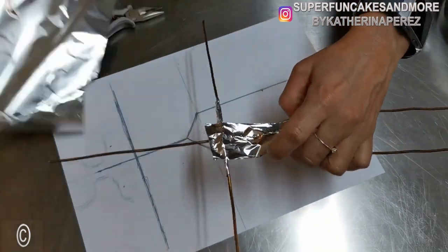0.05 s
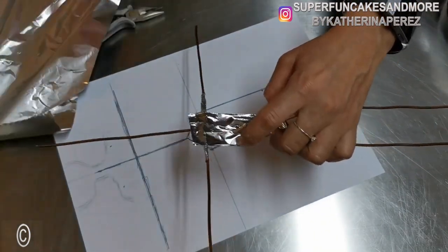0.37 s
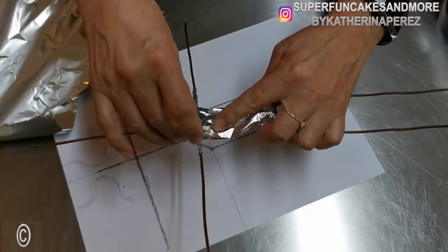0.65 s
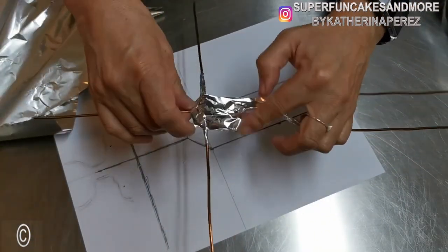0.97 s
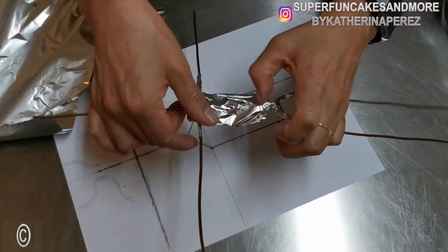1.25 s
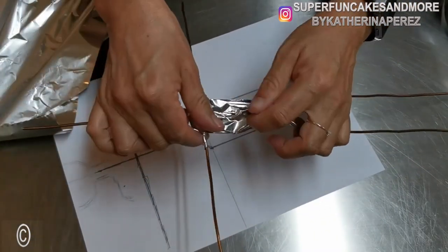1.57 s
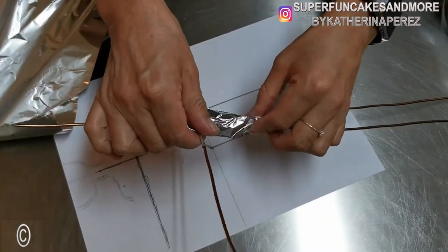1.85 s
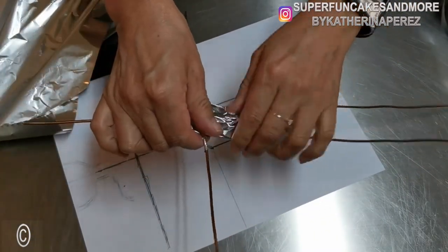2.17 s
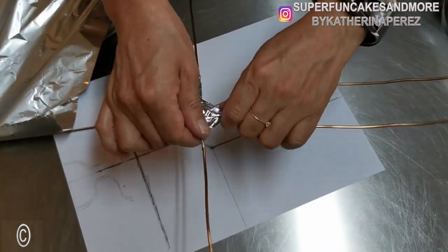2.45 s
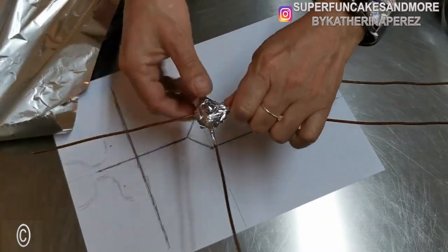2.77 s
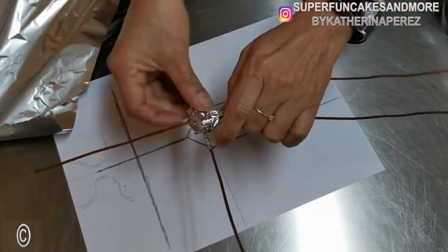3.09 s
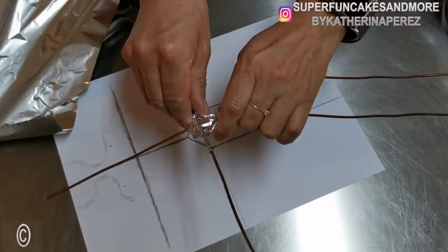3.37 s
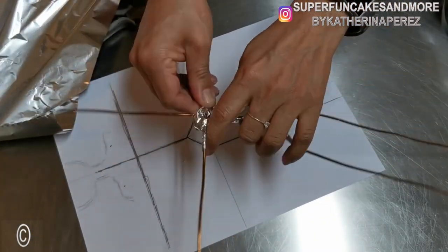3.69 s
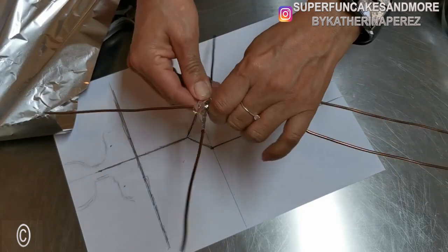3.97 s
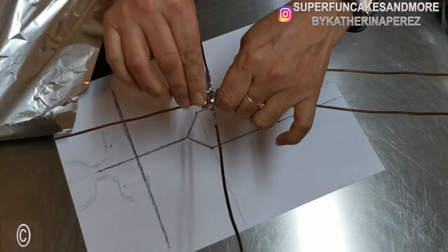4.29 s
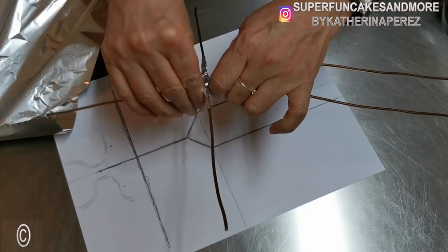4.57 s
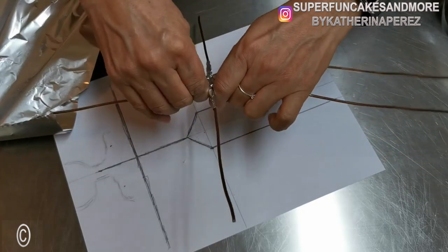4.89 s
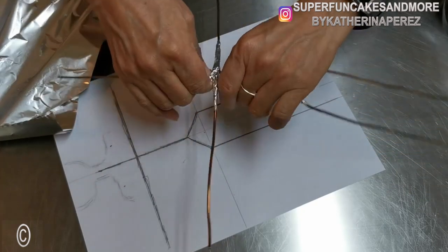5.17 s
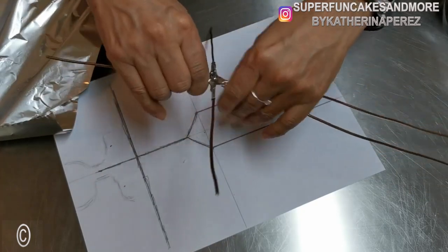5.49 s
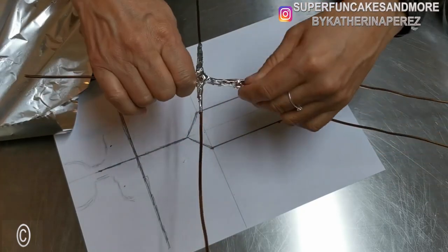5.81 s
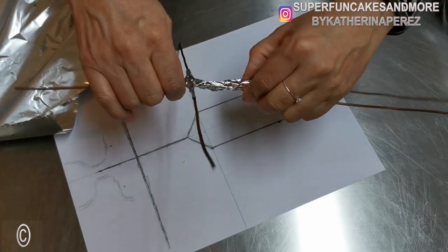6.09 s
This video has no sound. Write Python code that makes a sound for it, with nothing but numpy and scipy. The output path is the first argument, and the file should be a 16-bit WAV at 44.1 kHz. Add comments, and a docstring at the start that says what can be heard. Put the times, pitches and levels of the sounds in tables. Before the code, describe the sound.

A loose sheet of aluminium foil rustles as it is tugged aside. Hands then squeeze a strip of foil around a wire frame, making crisp crinkles and sharp snaps, with a few dull knocks on a steel table. The crackles thin out as the wad tightens, and the wire jolts the loose sheet into several short rattles. The microphone is close, in a small, hard room with a faint low hum.

```python
"""Aluminium foil: hands pull a loose sheet aside, then squeeze a strip round a wire frame on a steel table.
The sheet rustles as tiny facets flip; in the wad, fine creases crush and large ones snap one by one.
Wire and knuckles knock on the table; the wire's free end jolts the sheet, which rattles and rings.
A small hard room answers each snap, over air, hum and a low throb.
The right microphone hears little of the top octave."""
import sys
import numpy as np
from scipy import signal
from scipy.fft import rfft, irfft, next_fast_len
from scipy.io import wavfile

SR = 44100
rng = np.random.default_rng(int(sys.argv[2]) if len(sys.argv) > 2 else 0)


def transcribe(u):
    """Save the signal u as a 16-bit wav file named by the first command-line argument.

    u: samples, shape (n,) or (channels, n), limited to [-1, 1]; the rate is SR.
    q: integer samples, one column per channel.
    """
    v = np.clip(np.atleast_2d(u).T, -1, 1)
    q = np.round(v * 32767).astype(np.int16)
    wavfile.write(sys.argv[1], SR, q)


N = 275184
TIME_S = np.arange(N) / SR

# Tugs on the sheet. Each row: start in seconds, level in dB, hold in seconds.
SHEET_TUGS = [(0, -30, 0.0084), (.016, -32.5, 0.022), (0.089, -28, .006), (0.147, -28.5, 0.0033),
              (0.189, -30, .028), (0.2473, -23, 0.013), (0.286, -26.5, 0.041), (0.332, -22.5, 0.023),
              (0.401, -27, 0.033), (0.462, -31, 0.0069)]
# Spectra of sheet rustle, sheet on table, crushed wad. Each row: frequency in Hz, relative level in dB.
RUSTLE_DB = [(100, -67), (250, -22), (500, -23), (900, -13), (1600, -10.5), (2200, -2.5), (3500, -0.5),
             (6800, 3), (8000, 1), (9200, 6), (10800, 9), (12500, 4.5), (14000, 5), (16000, -11.5)]
DRAG_DB = [(150, -39.5), (370, 5), (520, -2.5), (720, 3.5), (1100, -17.5), (2500, -56)]
WAD_DB = [(100, -32), (400, -6), (1000, -11.5), (2200, -10.5), (3500, 1), (6500, -1.5), (8000, -3),
          (11000, 4.5), (13500, -4), (16000, 0)]
# Modes of sheet and table. Each row: frequency in Hz, relative level in dB, t60 in seconds.
SHEET_RESONANCES = [(219.6, -13, 0.61), (323, -5, 0.035), (484, -12.5, 0.2), (695, -16.5, 0.36),
                    (881, -9, 0.1), (1036, -34.5, 0.17), (1324, -7, 0.036), (1590, -23.5, 0.068),
                    (1974, -12.5, 0.048), (2076, 6.5, 0.029), (2130, -18, 0.12), (2280, -2, 0.038),
                    (4730, 6.5, 0.019)]
TABLE_RESONANCES = [(222.6, -22, 0.094), (620, -9, 0.015), (800, -2.5, 0.017), (934, -16.5, 0.12),
                    (972, -8.5, 0.056), (1200, -25, 0.017), (1250, -10.5, 0.025), (1860, -8.5, 0.02),
                    (3540, -4, 0.011)]
# Large creases in the wad. Each row: start in seconds, level in dB, facet's lowest pitch in Hz,
# tilt above it in dB per octave, body in dB, left minus right in dB.
CREASE_SNAPS = [(0.774, -35.5, 1266, -24, -12, -5.5), (0.8191, -30, 5740, 0, -10.5, -2),
                (0.893, -33, 8850, -28, -22, -1), (0.935, -33, 3740, 4.5, -5, 1),
                (0.958, -28.5, 6100, -3.5, -9.5, 1), (0.9769, -32, 8550, -8, -9, 2),
                (1.05, -31.5, 2960, 2, 1.5, -3), (1.135, -26, 5550, -4, 0.5, 1),
                (1.261, -27, 2400, 3.5, -3, -3), (1.323, -24, 2900, 7, -20, 1),
                (1.327, -33, 2950, 1, -20, 1), (1.4656, -23.5, 5000, -2, -11.5, -5.5),
                (1.7114, -47, 3330, -22, -11, 0), (1.7317, -39.5, 4560, 8.5, 1, -5),
                (1.8078, -45.5, 2850, -2, -1, -2), (1.901, -29, 3970, 1, -15, -5),
                (1.9658, -37, 3620, -12.5, -18, -2), (2.067, -43, 3650, -0.5, -15, -2),
                (2.172, -39.5, 3800, -4.5, -12, -5.5), (2.2, -37.5, 6900, 3, -22, -2),
                (2.2776, -34.5, 3500, 4, 3, -5), (2.351, -35.5, 1210, 1.5, -1, -7),
                (2.501, -35, 10800, -24, -36, -3), (2.579, -35, 9170, -8, -23, -6),
                (2.5952, -31.5, 5100, 8.5, -28, -3), (2.6244, -30.5, 3840, 2, -20, -5),
                (2.6276, -31.5, 3740, -7, -11, -3), (2.6695, -34, 6300, -2, -26, -1),
                (2.7791, -25.5, 3280, 4.5, -28, -2.5), (3.1767, -22.5, 5000, 11, -16, 3),
                (3.1802, -27, 4500, 5.5, -17, 3), (3.26, -26, 2600, 7.5, -3, -0.5),
                (3.6918, -36, 3194, 5.5, -7.5, 2), (4.156, -33, 6750, 10.5, -18, 1.5),
                (5.054, -30.5, 3670, 8, -20, -0.5), (5.3236, -37, 8900, -15, -14, 1)]
# Fingers on the wad. Each row: start in seconds, length in seconds, level in dB.
WAD_SQUEEZES = [(0.802, 0.33, -46), (1.128, 0.043, -38), (1.169, 0.053, -34), (1.335, 0.019, -31.5),
                (1.722, 0.26, -57), (2.038, 0.15, -52), (2.274, 0.079, -43), (2.348, 0.19, -50),
                (2.608, 0.072, -41), (2.963, 0.41, -65.5), (3.661, .178, -48), (4.113, .05, -55.5),
                (4.577, .15, -61.5), (5.27, 0.11, -51), (5.621, 0.17, -54), (5.739, 0.058, -41)]
# The wad's low range, lost as it packs tight. Each row: time in seconds, gain in dB.
WAD_LOWS_DB = [(.8, -5), (1.2, 5), (2.4, 3), (2.62, -18), (3.7, -25), (5.7, -16)]
# Knocks on the table. Each row: start in seconds, level in dB.
TABLE_KNOCKS = [(.9445, -24.5), (.958, -28), (.979, -32), (1.137, -40), (1.343, -35.5), (1.466, -35.5)]
# Wire hitting the sheet. Each row: start in seconds, level in dB, rattle t60 in seconds, ring gain in dB.
WIRE_JOLTS = [(3.8471, -31, 0.37, -6.5), (4.82, -36, 0.14, -6), (4.9259, -46, 0.1, -17),
              (5.227, -58.5, .25, 6), (5.3576, -31.5, 0.38, -8), (5.5118, -38, 0.054, -5.5),
              (6.022, -48, .26, -5.5)]
# Room decay. Each row: frequency in Hz, t60 in seconds.
ROOM_T60_S = [(300, 0.55), (1300, 0.54), (3500, 0.39), (7000, 0.37), (10000, 0.32), (15000, 0.25)]
# Responses of the walls and of the right microphone. Each row: frequency in Hz, gain in dB.
WALLS_DB = [(200, -5.5), (3000, 2.5), (7000, -1), (10500, 2), (13000, -1.5), (16000, -4.5)]
RIGHT_MIC_DB = [(200, -2), (600, -4), (1800, -4), (2800, -2.5), (4200, 0), (6400, -1.5), (7500, 0.5),
                (9500, -18), (16000, -11)]
# Spectrum of the room's air. Each row: frequency in Hz, relative level in dB.
AIR_DB = [(15, -3), (45, 1.5), (60, -4.5), (80, -8.5), (130, -12), (200, -20), (350, -25), (480, -21.5),
          (800, -21), (1200, -28.5), (2500, -28.5), (5000, -37), (10000, -39), (16000, -42.5)]
# Likeness of the air in both microphones. Each row: frequency in Hz, correlation from 0 to 1.
AIR_CORRELATION = [(30, 0.86), (150, 0.96), (350, 0.78), (700, 0.06), (1400, 0), (16000, 0)]
# Hum partials. Each row: frequency in Hz, level in dB.
HUM_PARTIALS = [(108, -75.5), (161.5, -74), (215.3, -78.5)]
# Envelope of the low throb. Each row: time in seconds, relative level in dB.
THROB_DB = [(0, -51.5), (1, -41.5), (2.1, -47.5), (3.3, -44.5), (4.2, -51), (6.24, -46)]


def gain_of(db):
    """Decibels to amplitude."""
    return 10 ** (np.asarray(db) / 20)


def unit_rms(x):
    return x / np.sqrt(np.mean(x ** 2) + 1e-20)


def unit_energy(x):
    return x / np.linalg.norm(x, axis=1, keepdims=True)


def pan(left_minus_right_db):
    return gain_of(np.array([[1], [-1]]) * left_minus_right_db / 2)


def at_hz(points, hz):
    """Interpolates on a log-frequency axis."""
    f, value = np.transpose(points)
    return np.interp(np.log(hz + 1), np.log(f + 1), value)


def add(mix, start_s, sound):
    part = mix[:, max(round(start_s * SR), 0):][:, :sound.shape[-1]]
    part += sound[..., :part.shape[1]]


def colour(x, spectrum_db, size=2048):
    """Minimum-phase filter: nothing sounds before a click."""
    log_gain = np.log(gain_of(at_hz(spectrum_db, abs(np.fft.fftfreq(size, 1 / SR)))))
    taps = np.fft.ifft(np.exp(np.conj(signal.hilbert(log_gain)))).real
    return signal.fftconvolve(x, taps[None, :size // 2], axes=1)[:, :x.shape[1]]


def stereo_noise(size, correlation):
    a, b = rng.standard_normal((2, size))
    return np.array([a, correlation * a + np.sqrt(1 - correlation ** 2) * b])


def wander(bandwidth_hz):
    """Slow random drift, rms 1."""
    hz = np.fft.rfftfreq(N, 1 / SR)
    return unit_rms(irfft(rfft(rng.standard_normal(N)) * np.exp(-(hz / bandwidth_hz) ** 2), N))


def facet(rise_s=0.00039, decay_s=0.0008, bounce_s=0.00215, bounce_db=-10, bounce_decay_s=0.0011):
    """One facet flips: a noise burst for its dense, fast-dying modes, then its bounce off the table."""
    t = np.arange(700) / SR
    flip = (1 - np.exp(-(t / rise_s) ** 2)) * np.exp(-t / (decay_s * rng.uniform(.7, 1.3)))
    late_s = np.maximum(t - bounce_s, 0)
    bounce = gain_of(bounce_db) * (1 - np.exp(-late_s / rise_s)) * np.exp(-late_s / bounce_decay_s)
    return unit_energy(stereo_noise(len(t), correlation=0.71) * (flip + bounce))


def snap(db, lowest_hz, tilt_db_oct, body_db, cut_db_oct=42, body_hz=5000, top_hz=13500):
    """A crease gives way: the facet sounds above its lowest pitch, the foil around adds a dull body."""
    hz = np.geomspace(100, 17000, num=60)
    octaves = np.log2(hz / lowest_hz)
    facet_db = octaves * np.where(octaves < 0, cut_db_oct, tilt_db_oct)
    facet_power = gain_of(facet_db) ** 2 / (1 + (hz / top_hz) ** 8)
    body_shape_db = at_hz([(150, -19.5), (800, -4.5), (2000, -1)], hz)
    body_power = gain_of(body_db + body_shape_db) ** 2 / (1 + (hz / body_hz) ** 2)
    spectrum_db = np.transpose([hz, 10 * np.log10(facet_power + body_power)])
    click = colour(np.pad(facet(), ((0, 0), (0, 800))), spectrum_db)
    return gain_of(db) * np.sqrt(0.0026 * SR) * unit_energy(click)  # energy of db held for 2.6 ms


def crackle(size, spectrum_db, flips_per_s, spread_db, tint_db=4, decay_s=0.00031, groups=5):
    """Facets flip at random, mostly small, a few large; each group has its own random tint."""
    padded = next_fast_len(size)
    t, hz = np.arange(300) / SR, np.fft.rfftfreq(padded, 1 / SR)
    burst_power = np.exp(-2 * t / decay_s) * (1 - np.exp(-t * 10000))
    knots_hz = np.linspace(0, SR / 2, num=14)
    spectrum = 0
    for _ in range(groups):
        flips = rng.random(padded) < flips_per_s / groups / SR
        flip_db = spread_db * np.minimum(rng.exponential(1, padded), 3.5)
        power = signal.oaconvolve(flips * gain_of(flip_db) ** 2, burst_power)[:padded]
        bursts = np.sqrt(abs(power)) * rng.standard_normal((2, padded))
        tint = gain_of(tint_db * rng.uniform(-0.27, 1, len(knots_hz)))
        spectrum = spectrum + rfft(bursts) * np.interp(hz, knots_hz, tint)
    return unit_rms(colour(irfft(spectrum, padded)[:, :size], spectrum_db))


def ring(modes, detune, attack_s=0.00024):
    """Decaying modes of a struck object, detuned a little at each blow."""
    t = np.arange(SR // 3) / SR
    out = np.zeros((2, len(t)))
    for hz, db, t60_s in modes:
        age_s = t[t < t60_s]
        detuned_hz = hz * (1 + detune * rng.uniform(-0.73, 1))
        cycles = detuned_hz * age_s + rng.random() + rng.random((2, 1)) / 4
        add(out, 0, gain_of(db - 60 * age_s / t60_s) * np.sin(2 * np.pi * cycles))
    return out * (1 - np.exp(-t / attack_s)) / 2


def sheet_snap(db, pan_db):
    """A crease gives way in the loose sheet."""
    return snap(db, lowest_hz=5930, tilt_db_oct=4, body_db=-6) * pan(pan_db)


def sheet_ring(db, clatter_s=.02, step_db=-4):
    """The sheet lands in three quick touches, each bending it to slightly different pitches."""
    out = np.zeros((2, SR // 3))
    for k, when in enumerate(rng.random(3)):
        touch = ring(SHEET_RESONANCES, detune=0.034)
        add(out, clatter_s * when * k / 2, gain_of(db + step_db * k) * touch)
    return out


def tugs(attack_s=0.0021, t60_s=0.22, snap_db=-0.5, rustle_db=-1, ring_db=-22):
    """Each tug starts with a snap and a faint ring; the sheet rustles while pulled, then settles."""
    out, t = np.zeros((2, N)), np.arange(SR // 3) / SR
    for start_s, db, hold_s in SHEET_TUGS:
        rustle = crackle(len(t), RUSTLE_DB, flips_per_s=1500, spread_db=2.5)
        settling_db = -60 * np.maximum(t - hold_s, 0) / t60_s
        add(out, start_s, sheet_snap(db + snap_db, pan_db=6))
        add(out, start_s, rustle * np.minimum(t / attack_s, 1) * gain_of(db + rustle_db + settling_db))
        add(out, start_s, sheet_ring(db + ring_db))
    return out


def drag(start_s=.01, length_s=0.14, level_db=-55):
    """A soft, hollow scuff as the sheet starts to slide."""
    out, size = np.zeros((2, N)), round(length_s * SR)
    scuff = unit_rms(colour(stereo_noise(size, correlation=0.98), DRAG_DB))
    add(out, start_s, gain_of(level_db) * scuff * signal.windows.tukey(size, .5))
    return out


def wad_snaps():
    """Large creases snap, each towards the side that its facet faces."""
    out = np.zeros((2, N))
    for start_s, db, lowest_hz, tilt_db_oct, body_db, pan_db in CREASE_SNAPS:
        add(out, start_s, snap(db, lowest_hz, tilt_db_oct, body_db) * pan(pan_db))
    return out


def squeezes(crush_db=-3, snaps_per_s=16):
    """Fingers crush fine creases and snap a few small ones; a loose wad has more body than a tight one."""
    out = np.zeros((2, N))
    for start_s, length_s, db in WAD_SQUEEZES:
        size = round(length_s * SR)
        lows_db = np.interp(start_s + length_s / 2, *np.transpose(WAD_LOWS_DB))
        tone_db = [(hz, level + lows_db * at_hz([(1500, 1), (9000, 0.058)], hz)) for hz, level in WAD_DB]
        crush = crackle(size, tone_db, flips_per_s=900, spread_db=1.5, tint_db=6)
        add(out, start_s, crush * signal.windows.tukey(size, .5) * gain_of(db + crush_db))
        for when, strength, octaves in rng.uniform(-1, 1, (round(snaps_per_s * length_s), 3)):
            snap_db = min(db + 4, -44) + 3 * strength
            click = snap(snap_db, lowest_hz=5500 * 2 ** octaves, tilt_db_oct=-1, body_db=lows_db - 14)
            add(out, start_s + length_s * (1 + .7 * when) / 2, click)
    return out


def knocks():
    """Wire and knuckles knock dully on the paper-covered table."""
    out = np.zeros((2, N))
    for start_s, db in TABLE_KNOCKS:
        add(out, start_s, gain_of(db) * ring(TABLE_RESONANCES, detune=0.017))
    return out


def jolts(snap_db=8.5, bright_db=3, bounce_s=0.04, bounce_t60_s=0.033):
    """Jolted by the wire, the sheet snaps, rattles and rings, then falls back with a softer touch."""
    out, t = np.zeros((2, N)), np.arange(SR // 3) / SR
    tone_db = [(hz, db + bright_db * at_hz([(7000, 0), (15000, 1)], hz)) for hz, db in RUSTLE_DB]
    for start_s, db, first_t60_s, first_ring_db in WIRE_JOLTS:
        add(out, start_s, sheet_snap(db + snap_db, pan_db=-5))
        touches = [(0, -2, first_t60_s, first_ring_db), (bounce_s, -5, bounce_t60_s, first_ring_db - 9)]
        for delay_s, rattle_db, t60_s, ring_db in touches:
            rattle = crackle(len(t), tone_db, flips_per_s=1500, spread_db=6)
            add(out, start_s + delay_s, rattle * gain_of(db + rattle_db - 60 * t / t60_s))
            add(out, start_s + delay_s, sheet_ring(db + ring_db))
    return out


def reflections(x, first_s=0.0017, build_s=0.0016, density=.2):
    """Random reflections swell within milliseconds, then each band dies at its own rate."""
    t = np.arange(SR * 3 // 4) / SR
    taps = rng.standard_normal((2, len(t))) * (rng.random((2, len(t))) < density)
    taps *= 1 - np.exp(-np.maximum(t - first_s, 0) / build_s)
    hz, age_s, bands = signal.stft(taps, SR, nperseg=256)
    decay = gain_of(-60 * age_s / at_hz(ROOM_T60_S, hz)[:, None])
    tail = signal.istft(bands * decay, SR, nperseg=256)[1]
    return signal.oaconvolve(x, unit_energy(tail), axes=1)[:, :N]


def room(x, cross_db=-3, shift_hz=2.5):
    """Sound from either side returns to both microphones, by paths that shift as the hands move."""
    cross, angle = gain_of(cross_db), 2 * np.pi * shift_hz * TIME_S
    same_side = reflections(x * np.cos(angle)) + reflections(x * np.sin(angle))
    return (same_side + cross * reflections(x[::-1])) / np.sqrt(1 + cross ** 2)


def room_tone(air_db=-56.5, throb_hz=28.8, throb_trim_db=-5, waver_hz=3, waver_db=0.5):
    """Steady air, a faint hum and a deep, wavering throb."""
    hz = np.fft.rfftfreq(N, 1 / SR)
    a, b = rfft(rng.standard_normal((2, N)))
    correlation = at_hz(AIR_CORRELATION, hz)
    noise = np.array([a, correlation * a + np.sqrt(1 - correlation ** 2) * b])
    air = unit_rms(irfft(noise * pan(3 - 2 * correlation) * gain_of(at_hz(AIR_DB, hz)), N))
    throb_cycles = np.cumsum(throb_hz + waver_hz * wander(6.74)) / SR
    throb = unit_rms(np.sin(2 * np.pi * throb_cycles) * gain_of(waver_db * wander(12.3)))
    throb *= gain_of(np.interp(TIME_S, *np.transpose(THROB_DB)) + throb_trim_db)
    drift_hz = waver_hz * wander(4.5)
    hum = sum(gain_of(db) * np.sqrt(2) * np.sin(2 * np.pi * np.cumsum(hum_hz + drift_hz) / SR)
              for hum_hz, db in HUM_PARTIALS)
    return gain_of(air_db) * air + hum + throb


def scene(close_send_db=-3, sheet_direct_db=-2):
    """The wad lies right under the microphones; the sheet is a little to the left and roomier."""
    close = wad_snaps() + squeezes() + knocks()
    sheet = (tugs() + jolts() + drag()) * pan(2)
    direct = close + gain_of(sheet_direct_db) * sheet
    to_walls = gain_of(close_send_db) * close + sheet
    left, right = direct + room(colour(to_walls, WALLS_DB))
    return np.vstack([left, colour(right[None], RIGHT_MIC_DB)]) + room_tone()


def record(dry):
    """Steep low-pass band limit."""
    cutoff_hz = 16250
    taps = signal.firwin(255, cutoff_hz, window=("kaiser", 8), fs=SR)
    return signal.oaconvolve(dry, taps[None], "same")


dry = scene()
out = record(dry)
transcribe(out)
```